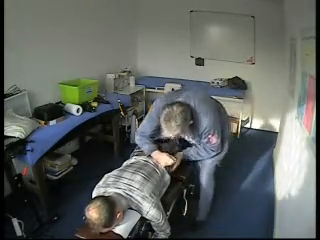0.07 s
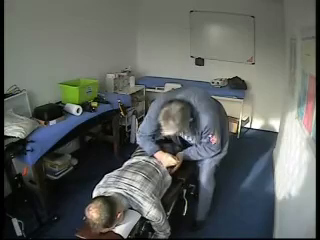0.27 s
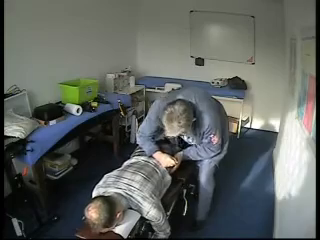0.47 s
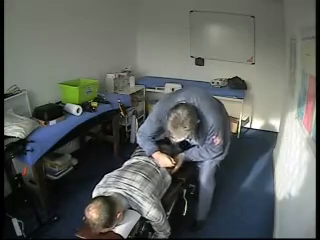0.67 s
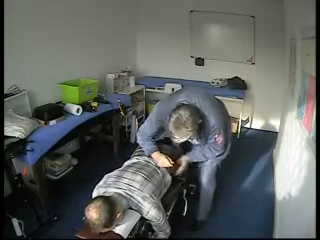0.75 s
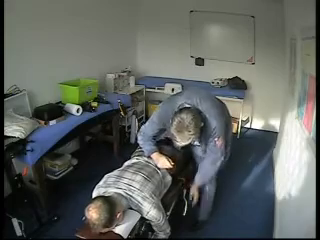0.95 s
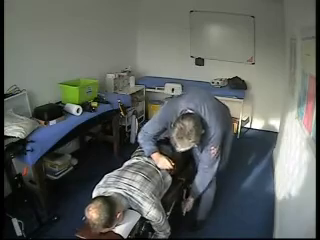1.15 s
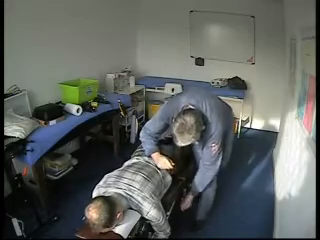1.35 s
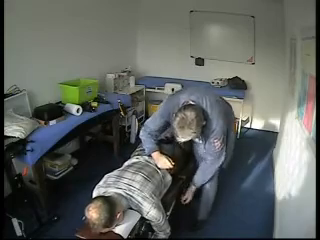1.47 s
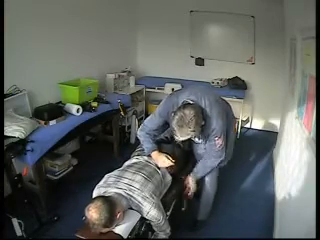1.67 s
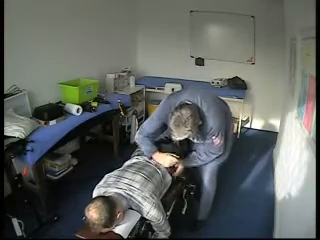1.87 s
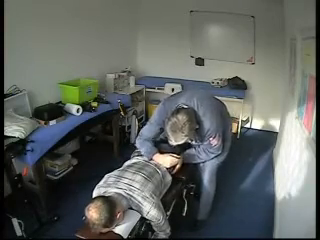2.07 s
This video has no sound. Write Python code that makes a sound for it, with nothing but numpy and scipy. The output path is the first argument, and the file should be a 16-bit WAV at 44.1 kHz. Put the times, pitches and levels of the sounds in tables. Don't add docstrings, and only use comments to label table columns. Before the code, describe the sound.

A padded treatment table section drops with a loud double knock and brief rattle, then its lever clicks and latches, and the frame knocks softly; small hard room, nearly mono camera microphone with hiss.

```python
import sys
import numpy as np
from scipy import signal
from scipy.fft import rfft, irfft
from scipy.io import wavfile
from scipy.ndimage import uniform_filter1d

SR = 44100
rng = np.random.default_rng(int(sys.argv[2]) if len(sys.argv) > 2 else 0)


def invert_db(level):
    return 10 ** (np.asarray(level, dtype=float) / 20)


def inscribe(sig):
    pcm = np.round(np.clip(np.atleast_2d(sig).T, -1, 1) * 32767)
    wavfile.write(sys.argv[1], SR, pcm.astype(np.int16))


N = 92610

# f/Hz, level/dB per Hz
HISS_COLOUR = [(20, 6), (60, 11.5), (110, 3), (256, 3), (1000, -7.5), (5300, -18.5), (7000, -18.5),
               (10700, -22), (12200, -43)]
# f/Hz, likeness/0..1
HISS_LIKENESS = [(60, .9), (150, .8), (400, .94), (1200, .985), (3000, .998), (11000, .9985)]
# harmonic/multiple, level/dB
HUM = [(1, -60), (5, -82.5), (7, -90)]
# f/Hz, level/dB
WHINE = [(6325, -101), (6375, -100), (6425, -82), (6475, -98), (10325, -94)]
# f/Hz, t60/s
ROOM_T60 = [(80, 0.42), (300, 0.43), (1000, 0.48), (3000, 0.47), (6000, 0.33), (11000, 0.15)]
# f/Hz, side to mid/dB
ROOM_WIDTH = [(60, 10), (150, -24), (400, -29), (1100, -41), (3000, -49), (6000, -42), (11000, -40.5)]
# t/s, level/dB, f/Hz, rise/s
BOOMS = [
    (0.201, -45, 30, 0.026),
    (.24, -52, 60.4, .02),
    (0.294, -43, 65.5, 0.038),
    (0.467, -51.5, 61, 0.013),
    (1.437, -49, 60.7, 0.023),
    (1.531, -53.5, 69, 0.033),
    (1.798, -60, 61.6, 0.028),
    (1.898, -53.5, 70.3, 0.03),
]
# t/s, dull rub level/dB, bright rustle level/dB
RUB = [(0, -62, -61.5), (0.101, -72.5, -71.5), (.17, -61.5, -64.5), (0.178, -57.5, -65.5),
       (0.205, -50, -49), (.25, -67, -61), (0.549, -91, -94), (1.002, -79, -81), (1.158, -95, -99),
       (1.2, -71, -70), (1.38, -59, -116), (1.58, -62, -73.5), (1.66, -63.5, -61.5), (1.75, -68, -68),
       (1.901, -59.5, -66), (2.02, -65.5, -99), (2.048, -76, -54.5), (2.1, -88, -61)]
# f/Hz, level/dB per Hz
RUB_COLOUR = [(59, -15), (100, -18), (373, -8), (473, -28), (5530, -52), (6470, -50), (11000, -58),
              (14300, -53), (22000, -120)]
# f/Hz, level/dB per Hz
RUSTLE_COLOUR = [(300, 5), (1000, -1.5), (3500, -8.5), (7000, -20), (11000, -34)]
# centre t/s, level/dB, f/Hz, half width/s
PATS = [
    (0.0448, -39, 520, 0.00055),
    (0.0471, -45, 261, .0015),
    (.212, -30.5, 154, 0.0065),
    (.238, -20.5, 287, .001),
    (.24, -33, 159, 0.0067),
    (1.441, -31, 1076, 0.0014),
    (1.445, -39.5, 177, 0.0083),
    (1.607, -44.5, 347, .003),
]
# t/s, level/dB, f/Hz,
# length/cycles
SNAPS = [(0.155, -34, 1470, 0.27), (0.237, -21, 324, 2.06), (.715, -54.5, 4000, .8), (.95, -58, 2380, 4.7),
         (1.013, -53, 1278, .6), (1.188, -44.5, 3190, 4), (1.188, -54, 6000, 2.2), (1.248, -49, 1082, 2.8),
         (1.25, -49, 1680, 5), (1.414, -53, 3720, 4.9), (1.443, -35, 6350, 11.5), (1.603, -53, 4540, 2.2),
         (1.6012, -46, 2000, .6), (1.646, -41.5, 4170, 3), (1.646, -51, 6100, 5.8), (1.681, -51, 3870, 2.8),
         (1.709, -44, 1900, 1.7), (1.965, -59, 9500, 4)]
# t/s, level/dB, f/Hz, t60/s
RINGS = [(.24, -48.5, 1415, 0.42), (.237, -49, 1545, 0.34), (.237, -46.5, 509.5, 0.52),
         (1.19, -63.5, 1640, 0.41), (1.205, -63, 3500, 0.12), (1.445, -51, 1680, 0.36),
         (1.445, -53.5, 1890, 0.42), (1.445, -48, 825, 0.23), (1.445, -45, 419.6, 0.32),
         (1.8, -47, 384.6, 0.44), (2.085, -57, 3490, 0.072)]
# t/s, knock level/dB, thud level/dB, tick level/dB, rattle/s
DROP = [(0.178, -41.5, -37.5, -54.5, 0.0071), (.189, -47, -38.5, -56, 0.0054),
        (.198, -36, -44, -48.5, 0.0075), (.206, -18, -35, -32.5, 0.0026), (.209, -16.5, -18.5, -35, 0.0012),
        (.214, -39, -26.5, -41, 0.004), (0.2197, -29, -25, -44.5, 0.0028),
        (0.225, -26.5, -33.5, -36.5, 0.0032), (.232, -31, -26, -41, 0.005),
        (0.236, -20.5, -16.5, -35, 0.0017), (0.245, -49, -33.5, -53, 0.0015),
        (.249, -47, -38.5, -51, 0.00089), (0.26, -43, -35.5, -52, 0.0036), (.272, -47, -32.5, -65, 0.0082),
        (0.274, -49, -36, -52, 0.0035), (0.298, -45, -43.5, -50.5, 0.005), (0.318, -38, -40.5, -56, 0.0034),
        (0.486, -55.5, -49, -72.5, 0.0025)]
# t/s, knock level/dB, thud level/dB, tick level/dB, rattle/s
COCK = [(1.174, -53.5, -50, -64.5, 0.0065), (1.187, -45, -49, -61.5, 0.0039),
        (1.197, -63, -46.5, -71, 0.0071), (1.206, -63, -44.5, -69, 0.0042),
        (1.212, -62, -44.5, -86, 0.0023), (1.222, -63, -54, -74, .006), (1.231, -64, -45.5, -73, 0.0032),
        (1.249, -55, -46, -83, 0.008), (1.413, -50, -48, -57.5, 0.0092), (1.4255, -34.5, -32, -55, 0.0027),
        (1.431, -51, -32, -68, 0.0029), (1.436, -35, -42.5, -57, 0.0028), (1.439, -25, -34, -46.5, 0.0043),
        (1.443, -27.5, -30, -44.5, 0.0021), (1.450, -38, -31.5, -66, 0.0031),
        (1.457, -33, -35, -55.5, 0.017), (1.596, -58, -43, -68, 0.0026), (1.601, -42, -40, -61, 0.0047),
        (1.644, -42.5, -61, -65, 0.022)]
# t/s, knock level/dB, thud level/dB, tick level/dB, rattle/s
SETTLE = [
    (1.793, -36.5, -33.5, -52, 0.0052),
    (1.805, -39.5, -35, -50, 0.031),
    (1.835, -42.5, -49.5, -88, 0.033),
    (1.874, -55.5, -50.5, -92, 0.037),
    (1.921, -75, -59, -102, 0.0087),
    (2.038, -41, -44, -56.5, 0.024),
    (2.058, -59, -37.5, -62.5, 0.016),
    (2.085, -47, -47.5, -77, 0.014),
]
# contacts/per s, first contact/share, rise/s
HARD = (6000, 1.25, 0.00041)
SOFT = (9000, 1, 0.00052)
# f/Hz, level/dB
BOARD = [(152, 0), (200, -0.5), (257, -0.5), (312, 1), (372, 7.5), (420, -2), (460, -17.5), (510, -26.5),
         (570, -6.5), (630, -9.5)]
# f/Hz, level/dB
FRAME = [(720, 6), (860, 11.5), (1000, -0.5), (1130, 14), (1270, 8), (1410, 10.5), (1630, 14), (1850, 12),
         (2080, 2.5)]
# f/Hz, level/dB
LATCH = [(2350, -1.5), (2700, 1), (3050, 3.5), (3400, 5), (3800, 2), (4400, -2), (5100, -3), (5800, -2),
         (6500, -3), (7500, -8), (8600, -10), (9900, -10.5), (11000, -45)]
PART_TRIM = [-9.5, -14, -3.5]
# f/Hz, left minus right/dB
MIC_LEAN = [(40, -4), (70, -6), (130, -3), (300, -.8), (600, 0)]
# f/Hz, left leads/rad
MIC_LEAD = [(0, 0.026), (260, 0.49), (690, 0.19), (1550, 0.14), (12000, 0.045)]
# f/Hz, share of time dropped/0..1
DROPOUTS = [(2000, 0), (4000, .05), (5200, .12), (5900, .4), (6250, 0), (6600, 0), (7200, .1), (9500, .2),
            (11000, .15)]

HISS_DB, MAINS_HZ, HUM_LEAN_DB, WHINE_LEAN_DB = -69.5, 49.95, 2.2, 11
ROOM_DB, SNAP_ROOM_DB, ROOM_GAP_S, TURN_PER_S = -9, -3.5, .004, 25
GRAIN_DB = 3
WOBBLE_HZ = 130
SCATTER_DB, DETUNE = 1.5, .03
SHIFT_PER_S = 70
EVEN = .7
CLIP_LEVEL, EDGE_HZ, BASS_HZ, DROPOUT_DB = .22, 11730, 15, -14


def evened(x):
    return x / np.sqrt(np.mean(x ** 2) + 1e-20)


def read(points, hz):
    f, value = np.transpose(points)
    return np.interp(np.log(hz + 1), np.log(f + 1), value)


def colour(x, points):
    return irfft(rfft(x) * invert_db(read(points, np.fft.rfftfreq(N, 1 / SR))), N)


def add(mix, s, sound):
    part = mix[round(s * SR):][:len(sound)]
    part += sound[:len(part)]


def leaning(x, db):
    return x * invert_db([[db / 2], [-db / 2]])


def camera_noise():
    left, extra = rng.standard_normal((2, N))
    same = np.clip(read(HISS_LIKENESS, np.fft.rfftfreq(N, 1 / SR)), 0, 1)
    right = irfft(same * rfft(left) + np.sqrt(1 - same ** 2) * rfft(extra), N)
    hiss = invert_db(HISS_DB) * evened(colour(np.array([left, right]), HISS_COLOUR))
    t = np.arange(N) / SR
    hum = sum(invert_db(db + 2) * np.sin(2 * np.pi * (k * MAINS_HZ * t + rng.random())) for k, db in HUM)
    whine = sum(invert_db(db - 1.5) * np.sin(2 * np.pi * (hz * t + rng.random())) for hz, db in WHINE)
    return hiss + leaning(hum, HUM_LEAN_DB) + leaning(whine, WHINE_LEAN_DB)


def three_turns(t, per_s):
    return np.sqrt(2 / 3) * np.cos(np.pi * (t * per_s + np.arange(3)[:, None] / 3))


def room(x):
    taps = np.zeros((6, SR))
    at = np.arange(round(ROOM_GAP_S * SR), SR - 20, 20)
    jitter = rng.integers(0, 20, (6, len(at)))
    np.put_along_axis(taps, at + jitter, rng.choice([-1., 1.], (6, len(at))), 1)
    hz, t, z = signal.stft(taps, SR, nperseg=512)
    decay = invert_db(-60 * t / read(ROOM_T60, hz)[:, None])
    tail = signal.istft(z * decay, SR, nperseg=512)[1]
    z = rfft(tail)
    tail = irfft(z / np.sqrt(uniform_filter1d(abs(z) ** 2, size=60)), tail.shape[1])
    tail = np.roll(tail, 400, axis=1)[:, :SR] * (np.arange(SR) > 400)
    tail = tail / np.linalg.norm(tail, axis=1)[:, None]
    sends = np.tile(x * three_turns(np.arange(N) / SR, TURN_PER_S), (2, 1))
    wet = signal.fftconvolve(sends, tail, axes=1)[:, 400:N + 400]
    return wet[:3].sum(0), wet[3:].sum(0)


def floor_boom():
    out, t = np.zeros(N), np.arange(SR // 2) / SR
    for s, db, hz, rise in BOOMS:
        swell = (t / rise * np.exp(1 - t / rise)) ** 1.42
        add(out, s, invert_db(db) * swell * np.sin(2 * np.pi * hz * t))
    return out


def rubbing():
    out = np.zeros(N)
    s, *levels = np.transpose(RUB)
    for db, tone in zip(levels, (RUB_COLOUR, RUSTLE_COLOUR)):
        grain = invert_db(GRAIN_DB * evened(uniform_filter1d(rng.standard_normal(N), 300)))
        noise = evened(colour(rng.standard_normal(N) * grain, tone))
        out += noise * invert_db(np.interp(np.arange(N) / SR, s, db))
    return out


def pad_pats():
    out, t = np.zeros(N), np.arange(1500) / SR - .01
    for s, db, hz, half in PATS:
        add(out, s - .01, -invert_db(db) * np.exp(-(t / half) ** 2 / 2) * np.cos(2 * np.pi * hz * t))
    return out


def pitched_snaps():
    out, t = np.zeros(N), np.arange(1500) / SR
    for s, db, hz, cycles in SNAPS:
        shape = np.exp(-t * hz / cycles) * (1 - np.exp(-t * hz * 8 / cycles))
        add(out, s, invert_db(db) * shape * np.sin(2 * np.pi * hz * t))
    return out


def steel_rings():
    out, t = np.zeros(N), np.arange(SR // 2) / SR
    wobble = rng.standard_normal((len(RINGS), 2, len(t)))
    for _ in range(2):
        wobble = uniform_filter1d(wobble, size=SR // WOBBLE_HZ // 2)
    for (s, db, hz, t60), (a, b) in zip(RINGS, wobble):
        tone = evened(a * np.sin(2 * np.pi * hz * t) + b * np.cos(2 * np.pi * hz * t))
        add(out, s, invert_db(db - 60 * t / t60) * tone * (1 - np.exp(-t / 0.0038)))
    return out


def mode_ring(modes, chance):
    t = np.arange(1800)[:, None] / SR
    hz, db = np.transpose(modes)
    t60 = .010 * (1000 / hz) ** .75
    sign = np.where(hz > 600, (-1.) ** np.arange(len(hz)), 1)
    level = invert_db(db + SCATTER_DB * chance[:len(hz)] - 60 * t / t60)
    tone = np.sin(2 * np.pi * hz * (1 + DETUNE * chance[-len(hz):]) * t)
    return (sign * level * tone * (1 - np.exp(-t * hz * 2))).sum(1)


def rattle(rattle_s, kind):
    per_s, first, rise_s = kind
    t = np.arange(4000) / SR
    force = np.clip(rng.standard_normal(len(t)), -1, 1)
    hits = (rng.random(len(t)) < per_s / SR) * force * (1 - np.exp(-t / rise_s))
    hits[0] = first
    hits = hits * np.exp(-t / max(rattle_s, .0005))
    z = rfft(hits, 2 * len(hits))
    return irfft(z / uniform_filter1d(abs(z) ** 2, size=16) ** (EVEN / 2))[:len(hits)]


def knock(knock_db, thud_db, tick_db, rattle_s, kind):
    hits = rattle(rattle_s, kind)
    spots = hits * three_turns(np.arange(len(hits)) / SR, SHIFT_PER_S)
    out = 0
    parts = [(BOARD, thud_db), (FRAME, knock_db), (LATCH, tick_db)]
    for (modes, db), trim in zip(parts, PART_TRIM):
        rings = np.array([mode_ring(modes, c) for c in rng.standard_normal((3, 40))])
        part = signal.fftconvolve(rings, spots, axes=1).sum(0)
        out = out + invert_db(db + trim) * part / np.sqrt(np.mean(part[:600] ** 2))
    return out


def table_knocks():
    out = np.zeros(N)
    for blows, kind in [(DROP, HARD), (COCK, HARD), (SETTLE, SOFT)]:
        for s, *blow in blows:
            add(out, s, knock(*blow, kind))
    return out


def scene():
    high_pass = signal.butter(2, 70, "high", fs=SR, output="sos")
    body = signal.sosfilt(high_pass, rubbing() + steel_rings() + table_knocks())
    surface = signal.sosfilt(high_pass, pad_pats() + pitched_snaps())
    wet, wet_side = room(body + invert_db(SNAP_ROOM_DB) * surface)
    mid = body + surface + invert_db(ROOM_DB) * wet + floor_boom()
    side = colour(wet_side, ROOM_WIDTH)
    hz = np.fft.rfftfreq(N, 1 / SR)
    port = invert_db(read(MIC_LEAN, hz) / 2) * np.exp(.5j * read(MIC_LEAD, hz))
    left = irfft(rfft(mid + side) * port, N)
    right = irfft(rfft(mid - side) / port, N)
    return np.array([left, right]) + camera_noise()


def treble_dropouts(x):
    hz, t, z = signal.stft(x, SR, nperseg=512, noverlap=384)
    power = uniform_filter1d((abs(z) ** 2).sum(0), size=3, axis=0)
    power = uniform_filter1d(power, size=14, axis=1)
    rank = power.argsort(1).argsort(1) / len(t)
    gain = np.where(rank < read(DROPOUTS, hz)[:, None], invert_db(DROPOUT_DB), 1.)
    gain = uniform_filter1d(gain, size=3, axis=1)
    return signal.istft(z * gain, SR, nperseg=512, noverlap=384)[1][:, :N]


def roll_off(x):
    return signal.sosfilt(signal.butter(12, 12370, fs=SR, output="sos"), x)


def record(dry):
    soft = CLIP_LEVEL * np.tanh(dry / CLIP_LEVEL)
    cut = signal.oaconvolve(soft, signal.firwin(127, EDGE_HZ, fs=SR)[None], "same")
    bass_cut = signal.butter(2, BASS_HZ, "high", fs=SR, output="sos")
    mix = signal.sosfilt(bass_cut, treble_dropouts(cut))
    return roll_off(mix)


dry = scene()
out = record(dry)
inscribe(out)
```